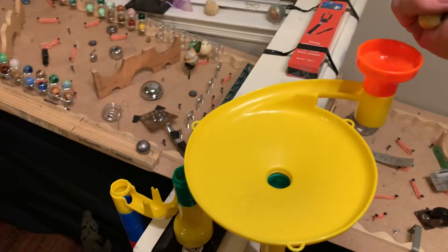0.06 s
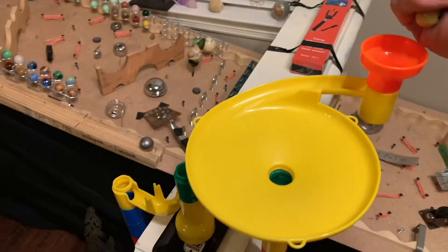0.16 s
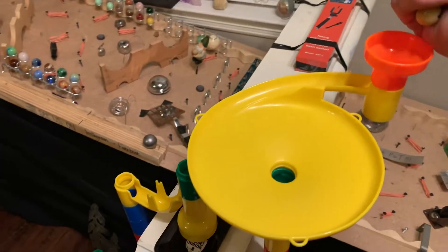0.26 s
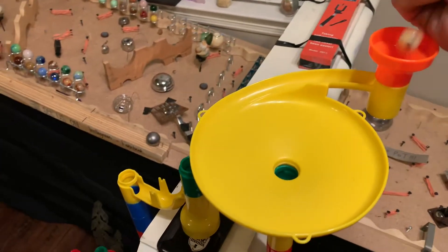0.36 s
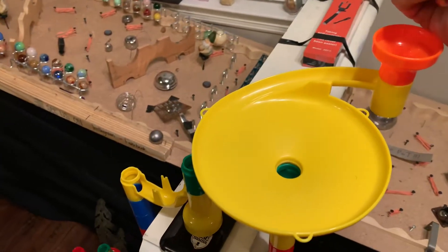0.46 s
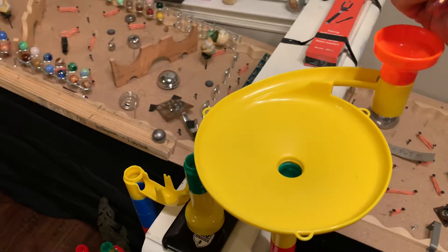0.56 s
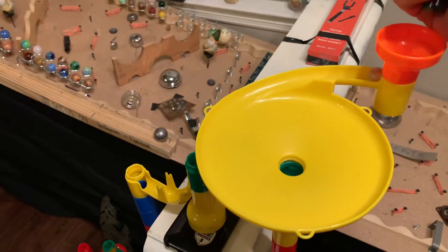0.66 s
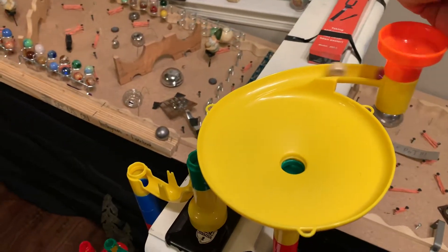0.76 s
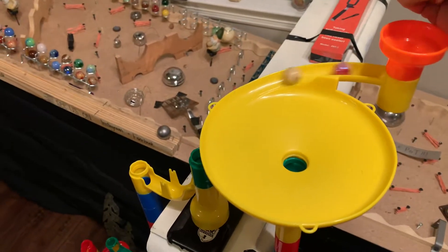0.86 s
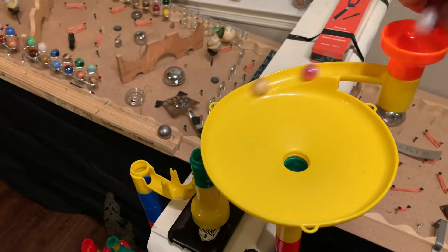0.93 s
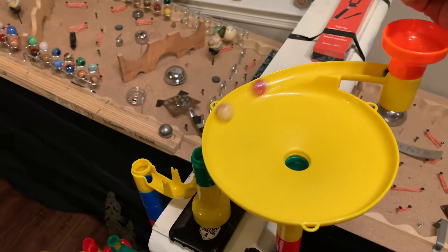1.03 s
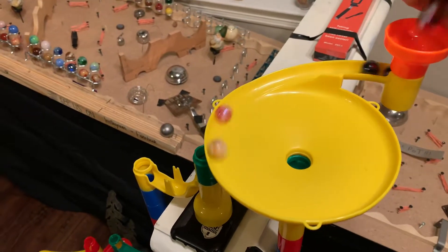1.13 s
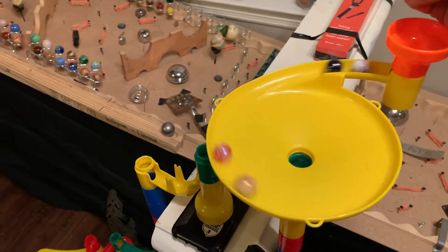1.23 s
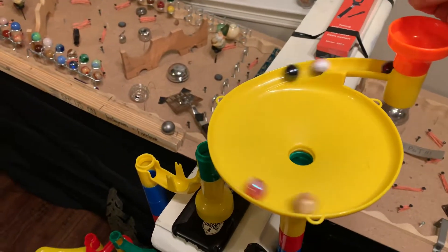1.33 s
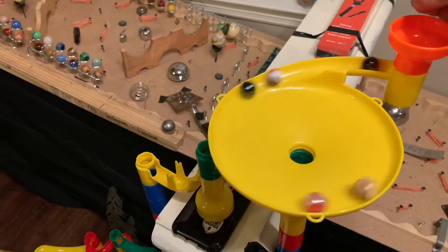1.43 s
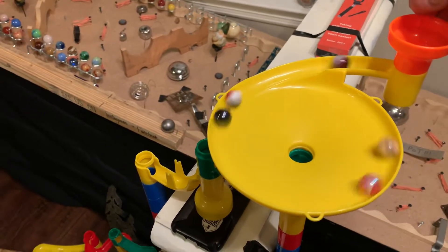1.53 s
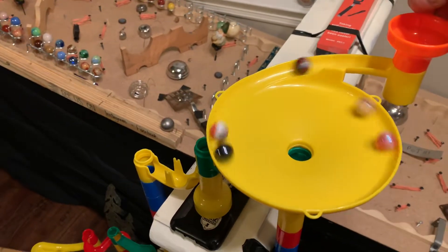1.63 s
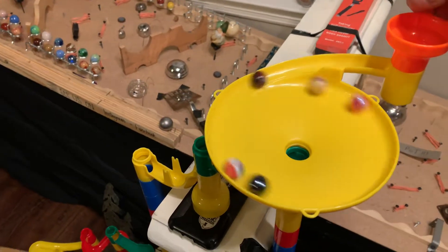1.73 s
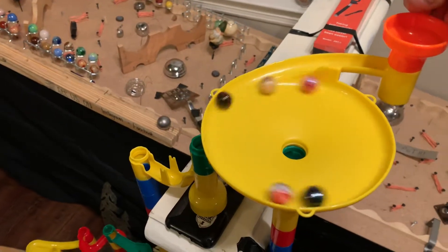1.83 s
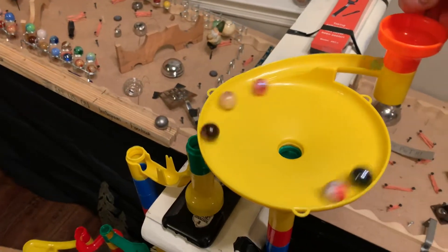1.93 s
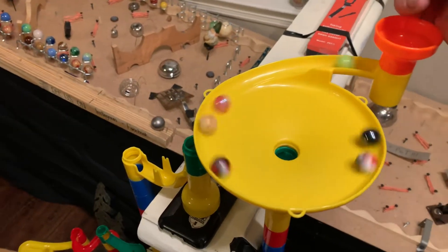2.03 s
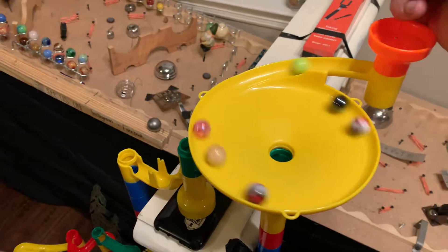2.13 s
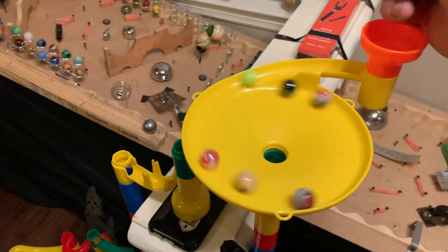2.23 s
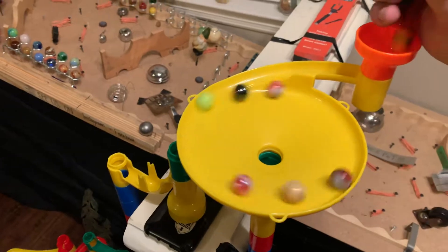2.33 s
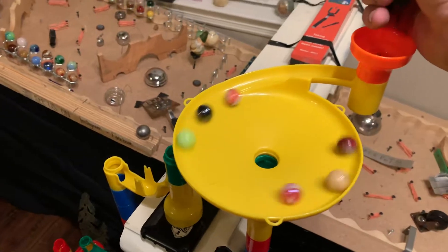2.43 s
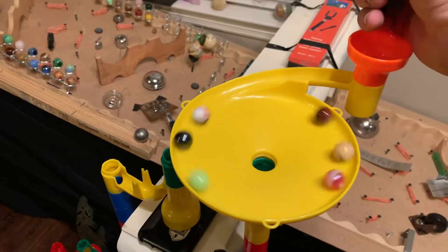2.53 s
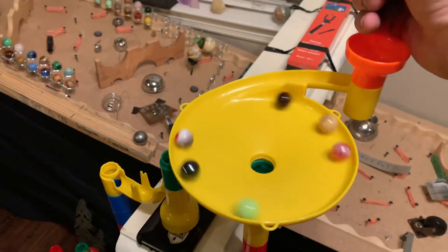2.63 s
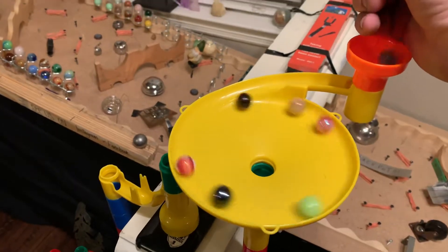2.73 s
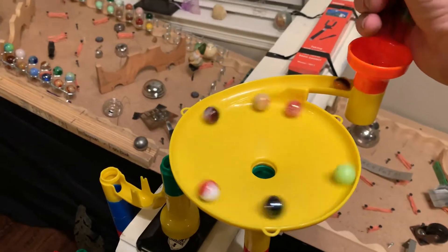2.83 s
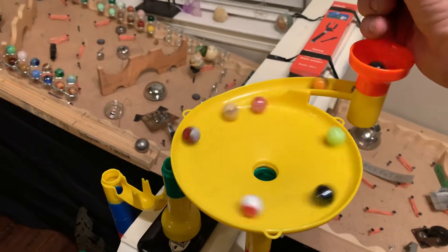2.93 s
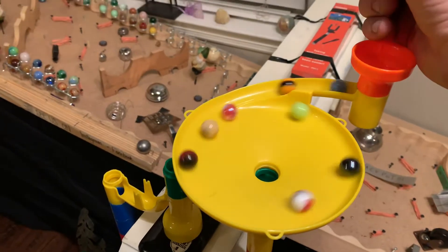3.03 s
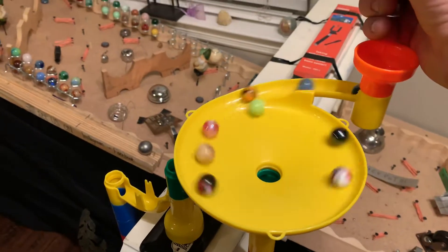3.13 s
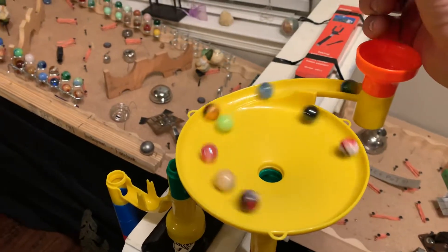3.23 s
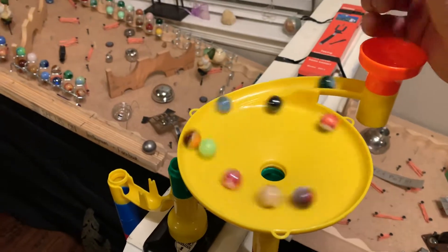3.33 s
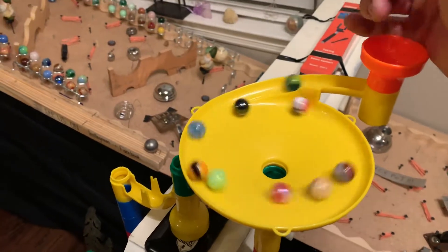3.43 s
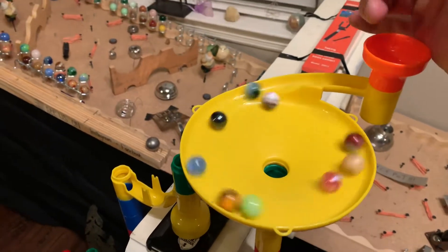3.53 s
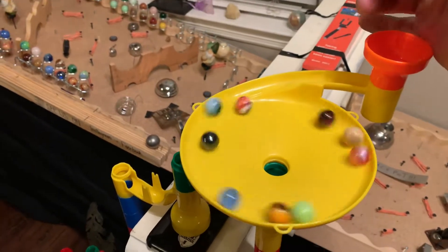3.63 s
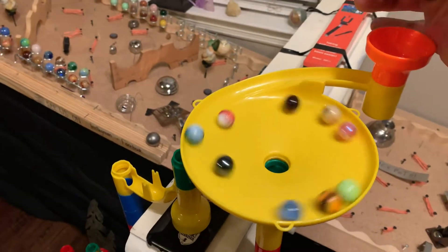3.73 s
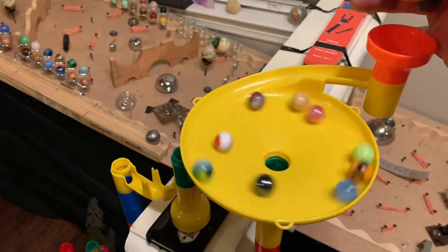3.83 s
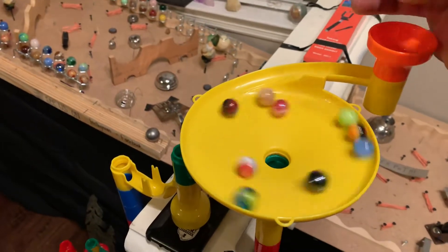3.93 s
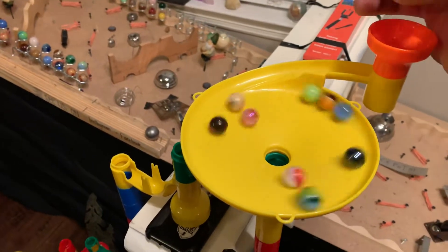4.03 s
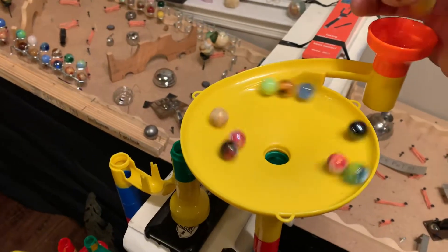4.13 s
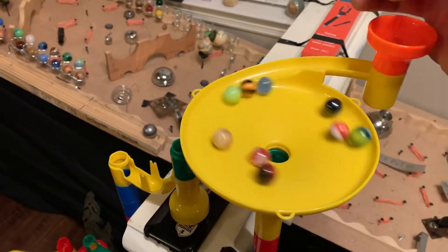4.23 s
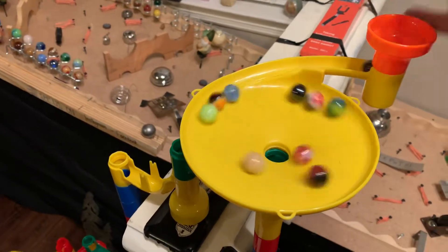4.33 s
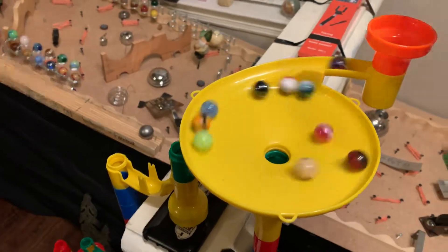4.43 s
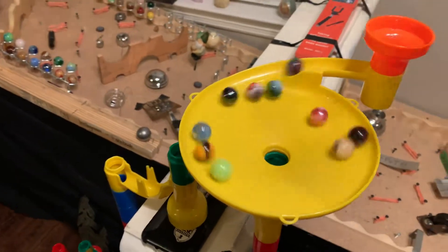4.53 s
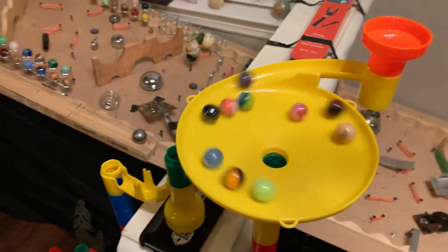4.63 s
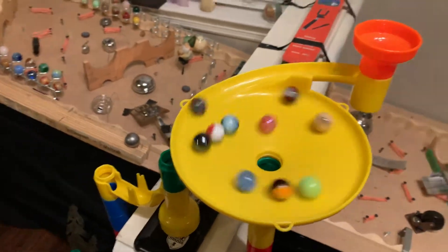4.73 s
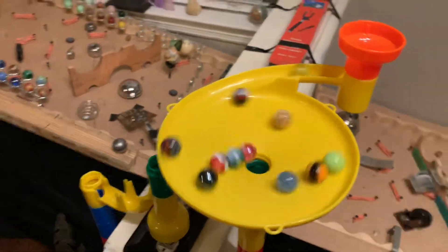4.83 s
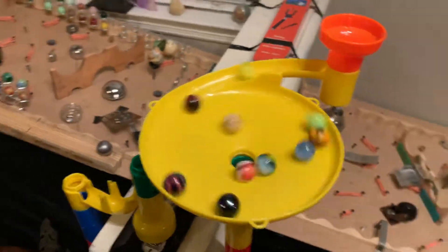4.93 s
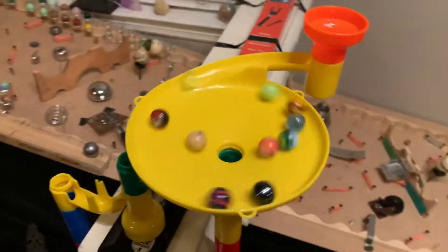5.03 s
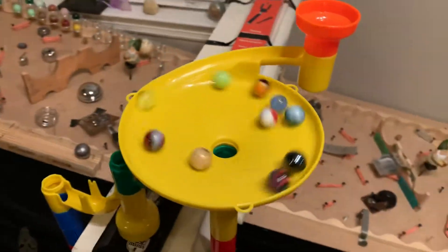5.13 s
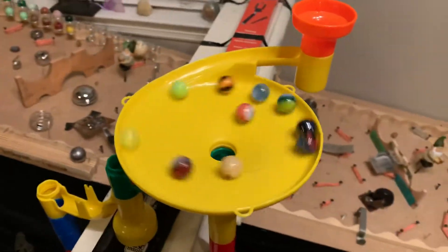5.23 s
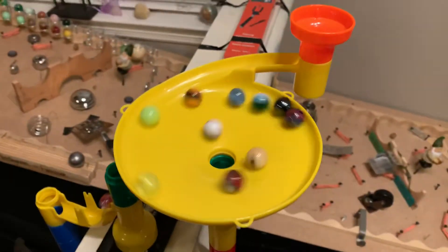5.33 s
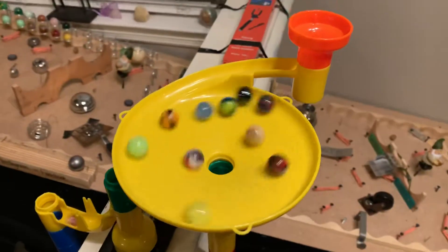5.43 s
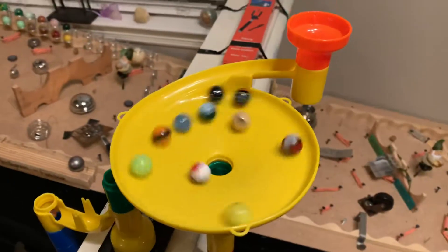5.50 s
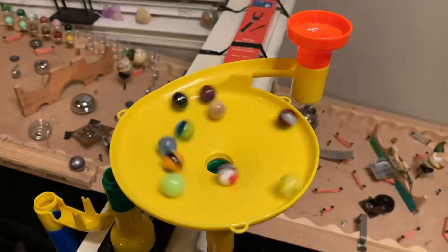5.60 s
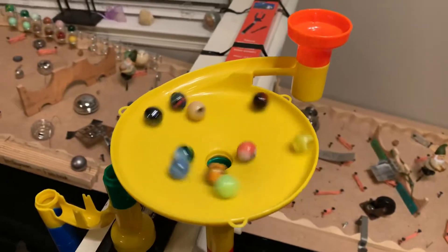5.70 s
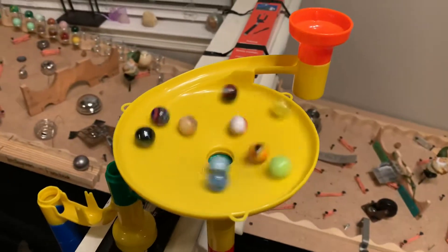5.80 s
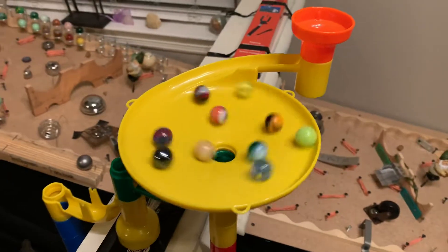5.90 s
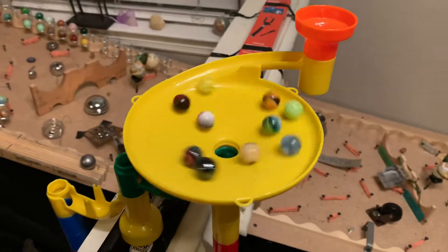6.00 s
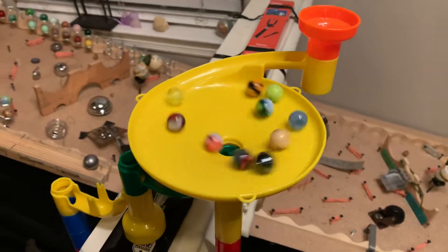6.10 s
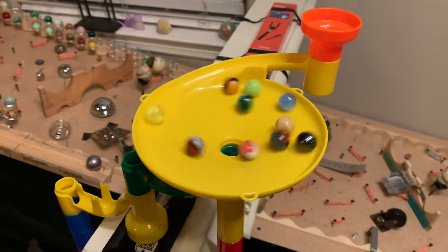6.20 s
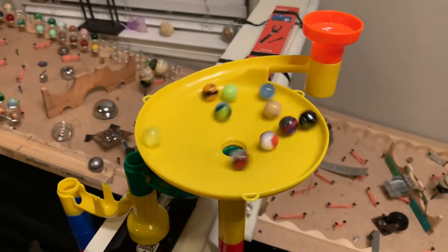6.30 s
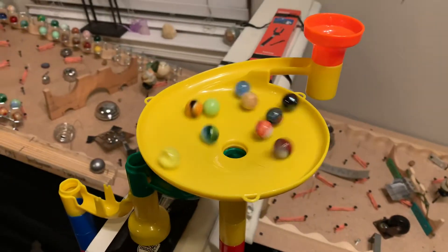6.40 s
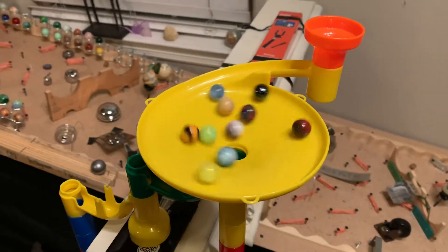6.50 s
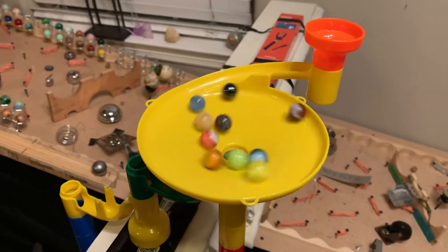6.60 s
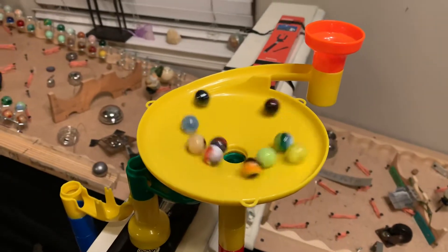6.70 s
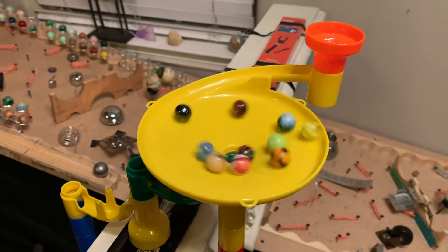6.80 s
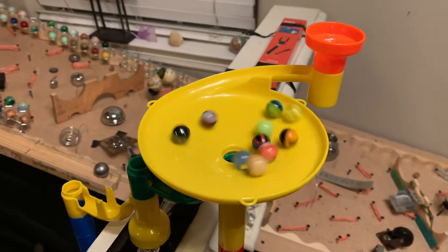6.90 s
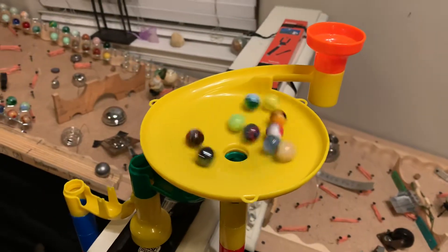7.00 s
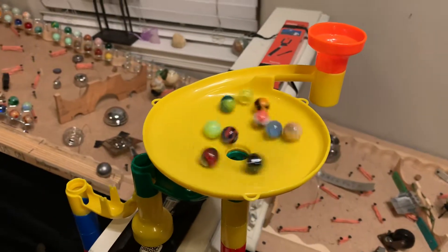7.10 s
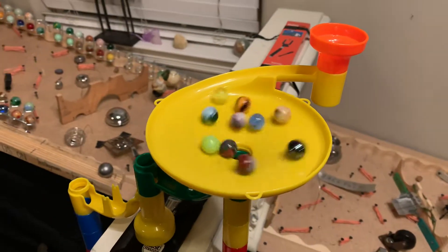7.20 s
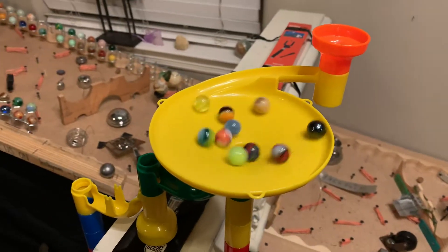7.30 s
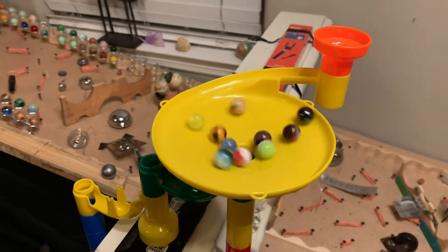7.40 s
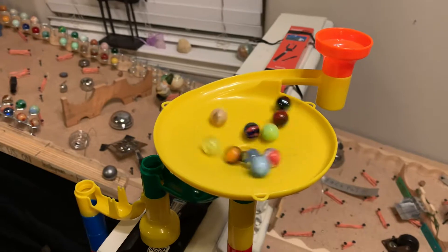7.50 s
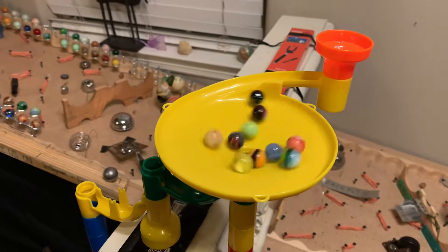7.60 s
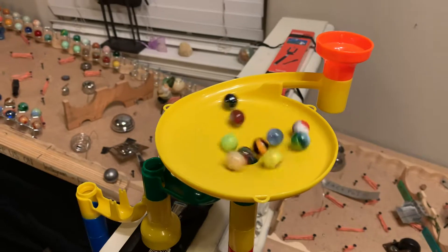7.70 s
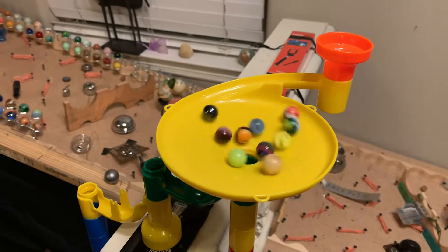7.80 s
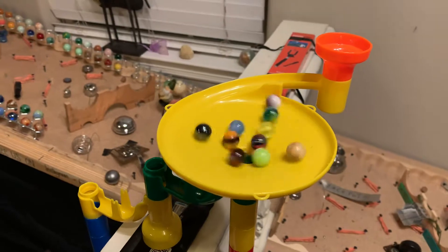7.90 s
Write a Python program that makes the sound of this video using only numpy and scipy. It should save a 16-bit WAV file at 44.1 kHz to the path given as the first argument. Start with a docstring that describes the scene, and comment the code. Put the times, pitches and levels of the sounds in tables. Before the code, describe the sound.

Glass marbles clatter into a plastic funnel, then roll around a wide plastic bowl with a wavering rumble and bright clicks.

```python
"""A brief wash of room echo dies away, then glass marbles clatter by hand into a plastic funnel, rattle
down a tube and chute and circle a wide plastic bowl. Each knock is a burst of rebounds ringing the
plastic; glass on glass gives tiny bright clicks. Rolling bumps the bowl into a wavering rumble with
grit on top. Under it lie soft table thuds and the hush of a small room, on a close two-port microphone."""
import sys
import numpy as np
from scipy import signal
from scipy.fft import rfft, irfft, next_fast_len
from scipy.io import wavfile
from scipy.ndimage import uniform_filter1d

SR = 44100
rng = np.random.default_rng(int(sys.argv[2]) if len(sys.argv) > 2 else 0)


def master_out(mix):
    """Clip the mix to full scale and print it as 16-bit PCM to the path in sys.argv[1]."""
    frames = np.transpose(np.atleast_2d(mix))
    ceiling = np.clip(frames, -1, 1)
    pcm = np.round(ceiling * 32767).astype(np.int16)
    wavfile.write(sys.argv[1], SR, pcm)


N = 350595

# Marble on plastic: start_s, level_db, favoured_pitch_hz, rattle_t60_s
KNOCKS = [(0.41, -38, 2260, 0.035), (0.4358, -8.5, 2740, 0.012), (0.4507, -4.5, 2560, 0.081),
          (0.498, -12.5, 2750, 0.066), (0.55, -12, 2740, 0.048), (0.7057, -1, 3800, 0.017),
          (0.722, -5.5, 2620, 0.045), (0.773, -5.5, 2740, 0.091), (0.799, 0, 3020, 0.065),
          (0.811, -6, 3000, 0.077), (0.8269, -1, 2780, 0.068), (0.843, -10, 1700, 0.045),
          (0.858, -2.5, 2700, 0.025), (0.9017, -7.5, 2670, 0.011), (0.934, -18, 2730, 0.019),
          (1.0147, 1, 3800, 0.04), (1.032, -13, 1530, 0.069), (1.0653, -9, 2770, 0.019),
          (1.105, -11, 1450, 0.25), (1.2065, -4, 1310, 0.087), (1.222, 2, 2880, 0.016),
          (1.2447, -5, 1460, 0.21), (1.341, -15, 1500, 0.03), (1.659, -34, 1690, 0.024),
          (1.762, -21, 1450, 0.04), (1.8358, -1, 4170, 0.012), (1.8603, -3, 3950, 0.023),
          (1.876, -9, 1500, 0.067), (1.9141, -2, 2600, 0.053), (2.027, -16.5, 1120, 0.04),
          (2.0949, -18.5, 1450, 0.025), (2.204, -30, 1700, 0.025), (2.263, -30, 1380, 0.013),
          (2.3864, -1.5, 1770, 0.026), (2.4132, -5.5, 1460, 0.053), (2.504, -14.5, 1700, 0.032),
          (2.6253, -12, 1700, 0.02), (2.6517, -3, 2720, 0.0095), (2.668, -10.5, 2760, 0.033),
          (2.71, -24, 1700, 0.021), (2.765, -5.5, 4230, 0.16), (2.8028, -5.5, 4210, 0.045),
          (2.932, -11, 3860, 0.036), (2.9531, -3, 2670, 0.056), (2.968, -5, 1180, 0.072),
          (3.0135, -5.5, 3260, 0.012), (3.0561, 1.5, 1630, 0.018), (3.071, -8.5, 1100, 0.015),
          (3.0921, -12, 2780, 0.0083), (3.127, -13, 1100, 0.017), (3.228, -13, 1640, 0.063),
          (3.29, -25, 1100, 0.048), (3.4015, -17.5, 1970, 0.13), (3.426, -18.5, 1700, 0.035),
          (3.5377, -7.5, 1660, 0.023), (3.6198, -12, 1420, 0.047), (3.686, -16.5, 1130, 0.034),
          (3.94, -9, 4190, 0.039), (3.9483, -4, 1710, 0.14), (3.9768, 0.5, 1250, 0.042),
          (4.1236, -11, 1430, 0.025), (4.15, -11.5, 1930, 0.0098), (4.2157, -10, 1610, 0.045),
          (4.2341, -3, 2360, 0.045), (4.252, -4, 1520, 0.2), (4.287, -10, 1700, 0.096),
          (4.304, -6, 2700, 0.05), (4.3573, -6, 1760, 0.019), (4.416, -1.5, 1670, 0.011),
          (4.4642, -7, 1830, 0.024), (4.621, -20, 1100, 0.066), (4.848, -16, 1680, 0.064),
          (4.9159, -4.5, 1800, 0.26), (4.9765, -2.5, 1900, 0.021), (5.0175, -4, 1860, 0.026),
          (5.0592, -9.5, 1880, 0.0086), (5.135, -9, 1850, 0.023), (5.165, -17, 1700, 0.018),
          (5.2562, -5.5, 1710, 0.11), (5.3211, -8.5, 1670, 0.079), (5.373, -15.5, 1140, 0.017),
          (5.4362, -10, 1540, 0.13), (5.4554, -5, 1560, 0.039), (5.5429, -10.5, 2350, 0.19),
          (5.592, -6.5, 1900, 0.074), (5.8614, -9, 2140, 0.32), (5.898, -14, 1500, 0.027),
          (5.9475, -11.5, 1850, 0.18), (6.0531, -10.5, 2200, 0.11), (6.0785, -11.5, 2280, 0.07),
          (6.194, -15, 1210, 0.055), (6.3038, -11, 1480, 0.01), (6.3879, -14.5, 1200, 0.062),
          (6.492, -18.5, 1700, 0.067), (6.5949, -17.5, 3300, 0.055), (6.706, -17, 1110, 0.018),
          (6.8308, -10, 1560, 0.053), (7.0306, -11.5, 2300, 0.023), (7.285, -16, 3260, 0.041),
          (7.352, -9, 1710, 0.074), (7.37, -11, 1980, 0.11), (7.674, -21, 1510, 0.049),
          (7.785, -25, 1500, 0.02)]
# Ring of the funnel plastic: pitch_hz, level_db, t60_s (capped in plastic_knocks)
FUNNEL_MODES = [(444.7, -0.5, 0.13), (498.3, 0, 0.1), (858.5, 5, 0.079), (1220, -1, 0.059),
                (1476, -1, 0.066), (1670, 3.5, 0.044), (1872, 9.5, 0.0093), (2382, -2, 0.057),
                (2700, -13.5, 0.022), (2736, 1, 0.045), (2993, 6, 0.028), (3280, -1, 0.076),
                (3370, -20, 0.02), (3920, 3, 0.024), (4240, -10, 0.02), (5796, -5, 0.056),
                (6440, -5.5, 0.057)]
# Glass on glass or on a hard edge: start_s, level_db, pitch_hz, clack_vs_tick_db
CLICKS = [(0.437, -26, 6200, 3), (0.453, -15.5, 5970, -2), (0.499, -27, 8650, 5), (0.706, -9, 5750, -26),
          (0.7425, -33, 7500, -1), (0.7747, -18, 6140, 3), (0.7851, -3.5, 9170, -39),
          (0.828, -12, 9100, -15), (0.859, -16, 8450, -11), (1.0154, -10, 6300, -3),
          (1.1048, -18, 8800, -3), (1.138, -31, 7800, -3), (1.206, -10, 6440, -11),
          (1.2276, -11.5, 7460, -9), (1.26, -23, 8100, 4), (1.775, -19, 8200, -12), (1.837, -20, 6400, -17),
          (1.8606, -10.5, 7950, -10), (1.911, -14, 8400, 1), (2.0222, -30, 8000, -9),
          (2.2312, -30, 8200, -13), (2.329, -26, 8200, -12), (2.384, -18, 6760, -7),
          (2.4109, -17.5, 7500, -15), (2.6525, -12, 8300, -16), (2.6866, -26.5, 7700, 6.5),
          (2.7666, -16.5, 7760, -2), (2.802, -15.5, 6600, -4), (2.919, -28, 8000, -11),
          (2.9282, -11, 7360, -10), (2.9406, -11.5, 6470, -3), (2.953, -18, 7600, -20),
          (3.0495, -21, 7960, -6), (3.056, -14.5, 9500, -6), (3.0925, -23, 8720, -5),
          (3.1257, -25, 8650, -4), (3.147, -25, 8200, -8), (3.2297, -21, 8300, -29), (3.535, -26, 6830, -9),
          (3.5675, -36, 7800, -15), (3.618, -22, 6950, -33), (3.9255, -35, 8200, -15),
          (3.936, -12.5, 9500, -13), (3.946, -20, 7600, -13), (3.9731, -9.5, 9200, -11),
          (4.15, -22, 6600, -18), (4.1763, -17, 7900, -20), (4.2057, -17, 7700, -7),
          (4.2174, -11.5, 6760, -4), (4.2338, -7.5, 9300, -7), (4.2499, -8.5, 8900, -12),
          (4.2677, -12, 7800, -3), (4.3044, -31, 7580, -4), (4.3587, -30, 7400, -1),
          (4.41, -14.5, 8900, -3.5), (4.4543, -20, 6340, -8), (4.5135, -29, 7940, 3),
          (4.584, -23.5, 8400, -24), (4.6575, -36, 8000, -15), (4.7016, -26, 8100, -8),
          (4.7164, -29, 8000, -15), (4.8466, -8.5, 9250, -23), (4.9142, -17, 9100, -6),
          (4.9255, -13, 8300, -8), (4.9332, -5.5, 8750, -20), (4.9449, -7.5, 8400, -12),
          (4.975, -17, 7800, 3), (5.0025, -17, 8000, -12), (5.019, -28, 8450, -3), (5.0415, -31, 8000, -12),
          (5.0576, -35, 8060, 15), (5.1323, -20, 8100, -9), (5.1606, -38, 8000, -10),
          (5.1786, -17, 8000, -24), (5.256, -8, 6930, -3), (5.3177, -10.5, 5650, 1),
          (5.3448, -19, 7960, -10), (5.412, -25, 8100, -15), (5.435, -10, 7300, 0.5),
          (5.5423, -9, 7660, -6), (5.589, -18, 6800, -15), (5.627, -21, 7430, 2), (5.639, -17.5, 6750, 3.5),
          (5.65, -25, 7300, 1), (5.687, -19.5, 6840, 4), (5.6975, -23, 7300, -3), (5.712, -11, 7140, -8.5),
          (5.7225, -26, 7440, -12), (5.745, -24, 7360, 0), (5.7703, -13, 7050, 0), (5.8031, -22.5, 8000, 4),
          (5.8247, -10.5, 7600, -5), (5.8679, -9, 7640, -5.5), (5.9457, -20.5, 7700, 13.5),
          (5.953, -8.5, 7300, -8), (5.965, -16.5, 7260, -2), (6.045, -20.5, 6750, 5),
          (6.0535, -18, 7500, -8), (6.0767, -19, 8250, 9.5), (6.0985, -23, 7600, 0),
          (6.1287, -37, 7460, 19), (6.1535, -24, 7600, -15), (6.192, -31, 7450, 4),
          (6.2528, -17.5, 7600, -11), (6.2722, -33, 7450, 6), (6.3036, -25, 6370, -7),
          (6.3588, -37, 8500, -14), (6.3819, -22.5, 7300, -2.5), (6.45, -23, 9500, -25),
          (6.492, -54, 6900, 24), (6.594, -21.5, 7100, 0.5), (6.65, -19.5, 8640, -20),
          (6.671, -21, 7900, -25), (6.6798, -23.5, 7700, 4), (6.7026, -36, 7000, 0),
          (6.7187, -11.5, 8800, -20), (6.7956, -24, 9200, 4.5), (6.8287, -19, 6900, -5),
          (6.8545, -23, 8430, -7), (6.876, -36, 8500, -25), (6.8991, -31, 7940, -3),
          (6.9152, -22.5, 9350, 4), (6.93, -30, 8000, -4), (6.9699, -27, 8700, -10),
          (6.9975, -33, 8000, -8), (7.012, -29, 7960, -25), (7.022, -26, 7300, -4), (7.0309, -37, 7000, 8),
          (7.0881, -20, 6700, -33), (7.128, -26.5, 7500, 4.5), (7.144, -31, 8500, -11),
          (7.2148, -29.5, 9100, 11), (7.269, -32, 8360, 8), (7.284, -34.5, 7800, 21),
          (7.32, -21, 8200, -18), (7.335, -31, 7500, -23), (7.353, -25, 6790, 5), (7.3637, -19, 8300, 4),
          (7.449, -26, 8200, -15), (7.4611, -30, 8900, 13.5), (7.4818, -23, 8250, 5),
          (7.5033, -18, 8600, -5), (7.549, -32.5, 8600, 15), (7.568, -26, 7560, -17),
          (7.5842, -23, 8900, -6), (7.703, -22, 9300, -19), (7.735, -26, 8200, -25),
          (7.873, -13.5, 9440, -35), (7.898, -25.5, 8440, -32)]
# Short rim modes that make the clack: pitch_hz, width_hz, level_db
CLACK_MODES = [(3450, 180, 0), (4160, 560, 2.5), (4530, 120, 2), (4960, 140, 1.5), (5380, 210, -1.5)]
# Fader ride of the marbles circling the bowl: time_s, rumble_db
ROLL_LEVELS = [(.44, -60), (.66, -69), (.7, -36), (.85, -35), (1.2, -29), (1.75, -30), (2.3, -29.5),
               (3.3, -28), (3.9, -29), (4.2, -26), (4.6, -29), (5.2, -30), (5.8, -28), (6.2, -29.5),
               (6.45, -32.5), (7.0, -31.5), (7.6, -32), (7.95, -36)]
# A marble rushing down tube and chute, or a bunch jostling: peak_s, rumble_db, grit_db
RUSHES = [(.8, -39, -45), (1.08, -50, -39), (1.3, -34, -34.5), (1.9, -22.5, -31), (2.5, -30, -43),
          (2.74, -30, -59), (3.0, -32, -28), (3.999, -21.5, -26), (4.3, -20, -23.5), (5.0, -22.5, -28),
          (5.35, -22, -30.5), (5.65, -33, -41), (5.95, -27.5, -35), (7.38, -41, -32.5)]
# Ring of the bowl: pitch_hz, width_hz, at_rim_db, near_hole_db
BOWL_MODES = [(476.6, 45, 0.5, -5.5), (656, 83, -63, -2.5), (875, 25, 6, 4), (919, 24, 3.5, 1),
              (989, 14, 9, 0), (1120, 20, -24, 1), (1158, 26, -25, -11), (1426, 29, 7, 0.5),
              (1683, 30, -2.5, -1.5), (1820, 34, -35, 4.5), (1988, 28, -8, 5.5), (2207, 35, -17, 2.5),
              (2328, 19, -6, 2), (2710, 120, -6.5, -1), (3070, 24, 3, -2), (3580, 52, -59, -44),
              (4040, 120, -10.5, -9.5), (4700, 47, -29, -11)]
# Wash between the bowl's modes: frequency_hz, gain_db
BOWL_WASH_EQ = [(150, -56), (380, -27), (520, 1), (740, 2), (1000, 6), (1700, 7), (3000, -5.5),
                (5000, -10.5), (9000, -44)]
# Colour of grit, cracks and click rattles: frequency_hz, gain_db
GRIT_EQ = [(2500, -6), (4000, -4), (6000, -2.5), (8000, -0.5), (10500, 3), (13500, -3.5), (16500, -19)]
# Phase between the ports, for funnel and bowl: frequency_hz, left_lead_rad
FUNNEL_PHASE = [(0, 0), (1720, -.5), (2670, .9), (4390, .5), (5500, 2.3), (7200, 0), (8600, -.9),
                (9900, -2.8), (11500, -3.5), (13000, -6), (14600, -6.7), (16500, -8.6)]
BOWL_PHASE = [(0, 0), (1000, .5), (1700, .6), (2760, 1.5), (4130, 1.9), (5800, 2.3), (7200, 0), (8600, -.9),
              (9900, -2.8), (11500, -3.5), (13000, -6), (14600, -6.7), (16500, -8.6)]
# Balance between the ports, for funnel and bowl: frequency_hz, left_over_right_db
FUNNEL_PAN = [(200, 1), (700, 1), (1400, 2), (2400, 3), (4400, -3), (8000, -1.2), (13000, 2.2)]
BOWL_PAN = [(200, 5.5), (700, 0.5), (1400, 2.5), (2400, 3.5), (4400, -3.5), (8000, -0.5), (13000, 0.8)]
# Reverb time of the room: frequency_hz, t60_s
ROOM_DECAY = [(200, 0.13), (1000, 0.19), (3500, 0.33), (6000, 0.27), (12000, 0.14)]
# Colour of the room tone: frequency_hz, gain_db
ROOM_TONE_EQ = [(15, -25), (30, -8), (46, 4), (85, -7), (120, -1), (155, -4.5), (300, 1.5), (500, -13),
                (1500, -22), (2500, -38), (8000, -54)]

FEED_ENDS_S = 4.7  # later hits are in the open bowl: less hollow, less snap
SPIRAL_START_S, SPIRAL_END_S = 0.81, 6.06  # the marbles drift from rim to hole
RUMBLE_DB_PER_S, GRIT_DB_PER_S = (151, 143), (206, 252)  # swell and fade of a rush


def plastic_knocks():
    """A marble strikes and rebounds in a short rattle that rings the plastic; each blow has its own tone."""
    out, t = np.zeros(N), np.arange(3000) / SR
    hz, db, t60 = np.transpose(FUNNEL_MODES)[:, :, None]
    fades = amp(db - 60 * t / np.minimum(t60, np.where((hz < 1100) | (hz > 5000), .11, .04)))
    landings = rng.standard_normal((len(KNOCKS), len(FUNNEL_MODES)))
    noise = rng.standard_normal((len(KNOCKS), len(t), 2))
    rebounds = noise[..., 0] * amp(2.93 * unit_rms(uniform_filter1d(noise[..., 1], 40)))
    rebounds[:, :110] *= amp(2)  # first contact hits hardest
    cracks = eq(rebounds, lambda f: amp(curve(GRIT_EQ, f)))
    slaps = eq(rebounds, lambda f: bell(f, 2200, 0.67))  # the many small modes in between
    low = hz[:, 0] < 1100
    swell = np.minimum(t / 0.0088, 1)  # the air in the tube takes a moment to speak
    for knock, landing, shake, crack, slap in zip(KNOCKS, landings, rebounds, cracks, slaps):
        start_s, level_db, pitch_hz, rattle_s = knock
        # where the marble lands bends and rebalances the modes
        rings = fades * np.sin(2 * np.pi * hz * (1 + .008 * np.roll(landing, 1)[:, None]) * t)
        weight = amp(1.4 * landing + 10.1 * bell(hz[:, 0], pitch_hz, 0.12)) * np.sign(landing)
        fall = np.minimum(t / 0.001, 1) * amp(-60 * t / rattle_s)
        bright = unit_rms(signal.fftconvolve(shake * fall, (weight * ~low) @ rings))
        bright[:len(t)] += amp(-4) * unit_rms(slap * fall ** 0.14)
        bright[:len(t)] += amp(-5) * unit_rms(crack * fall ** 0.38)
        hollow = signal.fftconvolve(shake * swell * fall ** 0.67, (weight * low) @ rings)
        hollow_db = -14 if start_s > FEED_ENDS_S else -13
        hollow_db += 1.5 * np.log2(rattle_s / .04)  # a longer rattle wakes the low modes more
        blow = bright / abs(bright).max() + amp(hollow_db) * hollow / abs(hollow).max()
        add(out, start_s, amp(level_db - 4) * blow)
    return out


def glass_clicks():
    """A millisecond tick pitched by contact time, a duller clack and a rattle of what holds the marbles."""
    out, t = np.zeros((N, 2)), np.arange(2500) / SR
    noise = rng.standard_normal((len(CLICKS), 3, len(t)))
    shakes = unit_rms(eq(noise[:, 0], lambda f: amp(curve(GRIT_EQ, f))))
    hz, width, mode_db = np.transpose(CLACK_MODES)[:, :, None]
    chance = rng.uniform(-1, 1, (len(CLICKS), len(CLACK_MODES) + 1))
    pans_db = 4 * chance[:, 0]
    woken = amp(11 * chance[:, 1:])  # each click wakes the rim modes differently
    clacks = eq(noise[:, 1], lambda f: woken @ (amp(mode_db) * np.exp(-((f - hz) / width) ** 2)))
    clacks /= clacks.std(axis=1, keepdims=True)
    snaps = unit_rms(eq(noise[:, 2], lambda f: bell(f, 13800, 0.15)))
    pulse = t / .0003 * np.exp(1 - t / .0003)
    snap_attack, body_attack = np.minimum(t / 0.00004, 1), np.minimum(t / 0.00065, 1)
    for (start_s, level_db, pitch_hz, clack_db), shake, clack, pan_db in zip(CLICKS, shakes, clacks, pans_db):
        snap_db = 1.5 if start_s < FEED_ENDS_S else -5
        snap_t60_s = .004 * amp(0.3 * (clack_db + 20))
        snap = snap_attack * amp(snap_db - 60 * t / snap_t60_s)  # a bare spike sharpens the front
        tick = pulse * np.sin(2 * np.pi * pitch_hz * t) + snap
        rattle_db = -4.5 - 0.047 * (level_db + 15) + .42 * (clack_db + 10)  # less on hard, clean clicks
        body = amp(clack_db - 6.5 - 60 * t / 0.078) * clack + amp(rattle_db - 60 * t / 0.028) * shake
        gains = amp(level_db + pan_db * np.array([.5, -.5]))
        add(out, start_s + .001, gains * (tick + body_attack * body)[:, None])
    return out.T


def rolling():
    """Surface roughness bumps the bowl thousands of times a second: a rumble with grit hissing on top."""
    t, steps = np.arange(N) / SR, np.arange(0, N / SR, .005)
    steady_power = amp(np.interp(steps, *np.transpose(ROLL_LEVELS), left=-120)) ** 2
    steady_grit_power = steady_power * amp(-27.5) ** 2
    peak_s, rumble_db, grit_db = np.transpose(RUSHES)
    begun = steps > ROLL_LEVELS[0][0]
    rumble_gain = np.sqrt(steady_power + begun * rush_power(steps, peak_s, rumble_db, RUMBLE_DB_PER_S))
    grit_gain = np.sqrt(steady_grit_power + begun * rush_power(steps, peak_s, grit_db, GRIT_DB_PER_S))
    rumble = bowl_ring(bumps(per_s=1100, spread_db=1.44) * amp(1.56 * wander(0.029)), t)
    mid, side = bumps(per_s=8000, spread_db=0.74), 0.25 * bumps(per_s=9700, spread_db=3.1)
    grains = np.array([mid + side, mid - side]) * amp(3.5 * wander(.004))
    grit = unit_rms(eq(grains, lambda f: amp(curve(GRIT_EQ, f)) / (1 + (f / 13000) ** 4)))  # softened top
    return np.interp(t, steps, rumble_gain) * rumble + np.interp(t, steps, grit_gain) * grit


def bowl_ring(drive, t):
    """The bowl's modes over a wash, held at an even level; the tone shifts as the marbles spiral inward."""
    inward = np.clip((t - SPIRAL_START_S) / (SPIRAL_END_S - SPIRAL_START_S), 0, 1)
    wash = eq(drive, lambda f: amp(curve(BOWL_WASH_EQ, f) - 7.5))
    dull_rim_wash = eq(wash, lambda f: 0.62 + 0.51 / (1 + (f / 1850) ** 28))
    out = inward * wash + (1 - inward) * dull_rim_wash
    ring = np.zeros(N)
    for hz, width_hz, rim_db, hole_db in BOWL_MODES:
        passing_db = 1.5 * wander(0.033)  # a mode swells as marbles pass its lively places
        gain = amp(rim_db + inward * (hole_db - rim_db) + passing_db)
        ring += signal.lfilter(*signal.iirpeak(hz, hz / width_hz, fs=SR), drive * gain)
    out += np.interp(t + .0003 * wander(.07), t, ring)  # a changing path to the microphone wavers the pitch
    return out / np.sqrt(uniform_filter1d(out ** 2, size=SR))


def rush_power(t, peak_s, peak_db, db_per_s):
    """Summed power of the rushing marbles: each rush swells to its peak and fades."""
    swell, fade = db_per_s
    late_s = t - peak_s[:, None]
    drop_db = np.where(late_s < 0, -swell * late_s, fade * late_s)
    return (amp(peak_db[:, None] - drop_db) ** 2).sum(0)


def bumps(per_s, spread_db):
    """Random tiny impacts, a few of them large."""
    size = amp(spread_db * np.minimum(rng.exponential(1, N), 5)) * rng.choice([-1., 1.], N)
    return unit_rms(size * (rng.random(N) < per_s / SR))


def table_thud(hits):
    """Blows shake the stand and table, putting a soft low bump under each hit."""
    shocks = uniform_filter1d(abs(hits.mean(0)), size=100)
    return amp(-19) * eq(shocks, lambda f: bell(f, 207, 0.77))


def room_echoes(send):
    """Sparse echoes of random sign, each band dying at its own speed; two unrelated tails."""
    taps = np.zeros((2, SR // 2))
    slots = np.arange(200, SR // 2 - 20, 20)
    arrivals = slots + rng.integers(0, 20, (2, len(slots)))
    np.put_along_axis(taps, arrivals, rng.choice([-1., 1.], arrivals.shape), 1)
    hz, t, bands = signal.stft(taps, SR, nperseg=256)
    tails = signal.istft(bands * amp(-60 * t / curve(ROOM_DECAY, hz)[:, None]), SR, nperseg=256)[1]
    return signal.fftconvolve(send[None], tails / np.linalg.norm(tails[0]), axes=1)[:, :N]


def room_tone():
    """A low bed of room air, opening with a noise wash like the dying echo of a clatter."""
    mid, side, noise = rng.standard_normal((3, N))
    tone = eq(np.array([mid + .2 * side, mid - .2 * side]), lambda f: amp(curve(ROOM_TONE_EQ, f)))
    echo = eq(noise, lambda f: f / 2500 / (1 + (f / 2500) ** 3.2))
    return amp(-54) * unit_rms(tone) + echo * amp(-41.5 - 60 * np.arange(N) / SR / 0.5)


def mic_ports(x, phase, pan):
    """Two ports hear one source with a phase and level difference set by its direction."""
    half = np.array([[.5], [-.5]])
    return eq(x, lambda f: amp(half * curve(pan, f)) * np.exp(1j * half * np.interp(f, *np.transpose(phase))))


def amp(db):
    return 10 ** (np.asarray(db) / 20)


def unit_rms(x):
    return x / np.sqrt(np.mean(x ** 2) + 1e-20)


def curve(points, hz):
    """Joins breakpoints along a log frequency axis."""
    point_hz, value = np.transpose(points)
    return np.interp(np.log(hz + 1), np.log(point_hz + 1), value)


def bell(hz, centre_hz, log_width):
    return np.exp(-(np.log((hz + 1) / centre_hz) / log_width) ** 2)


def eq(x, gain):
    """Filters x by gain(hz)."""
    size = next_fast_len(x.shape[-1] + 2048)
    return irfft(rfft(x, size) * gain(np.fft.rfftfreq(size, 1 / SR)), size)[..., :x.shape[-1]]


def wander(seconds):
    """Smooth random drift of rms 1."""
    width = round(seconds * SR)
    return unit_rms(uniform_filter1d(uniform_filter1d(rng.standard_normal(N), width), width))


def add(mix, start_s, sound):
    part = mix[round(start_s * SR):][:len(sound)]
    part += sound[:len(part)]


def scene():
    """Hits move from funnel to bowl as the feeding ends, over the rolling, the thuds and the room."""
    roll, hits = rolling(), plastic_knocks() + glass_clicks()
    near, scattered = room_echoes(amp(-10) * hits.mean(0) + amp(-11.5) * roll.mean(0))
    in_funnel = np.clip((5.2 - np.arange(N) / SR) / 0.87, 0, 1)
    mix = mic_ports((hits + near) * in_funnel, FUNNEL_PHASE, FUNNEL_PAN)
    mix += mic_ports((hits + near) * (1 - in_funnel) + roll, BOWL_PHASE, BOWL_PAN)
    side = eq(scattered, lambda f: 0.93 * bell(f, 2600, 1.25) + 0.19 * (f > 1500))
    mix += side * np.array([[1], [-1]])  # echoes from the sides widen mostly the mids
    mix = eq(mix, lambda f: 1 - 0.57 * np.exp(-((f - 740) / 55) ** 2))  # a narrow scoop in the mids
    low_cut = signal.butter(6, 390, "high", fs=SR, output="sos")  # small plastic parts radiate little bass
    return signal.sosfilt(low_cut, mix) + table_thud(hits) + room_tone()


def record(dry):
    """Soft clipping rounds the loudest peaks; a steep high cut trims the very top."""
    squeezed = .9 * np.tanh(dry / .9)
    high_cut = signal.firwin(1023, 16600, window=("kaiser", 12), fs=SR)
    return signal.oaconvolve(squeezed, high_cut[None], "same")


dry = scene()
out = record(dry)
master_out(out)
```